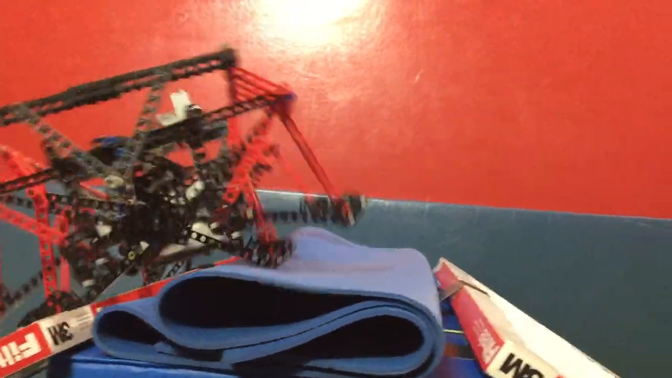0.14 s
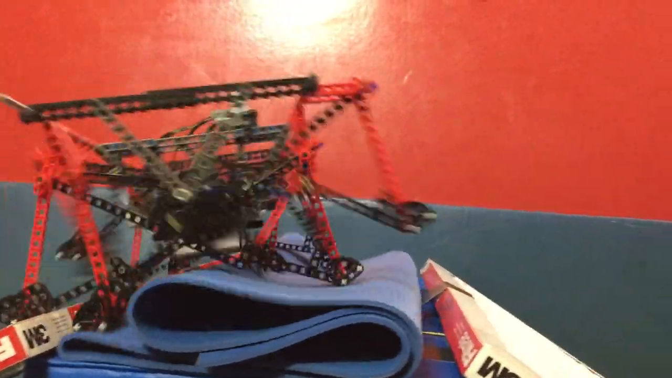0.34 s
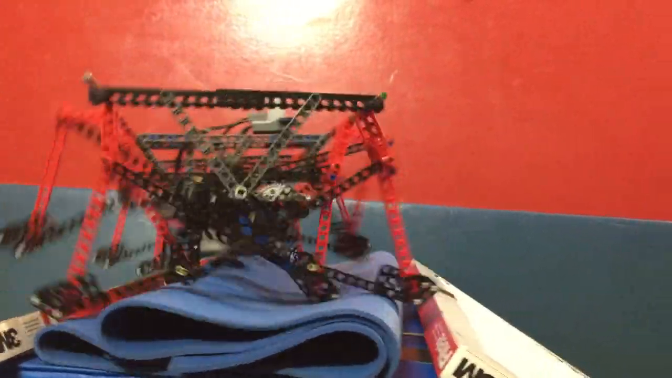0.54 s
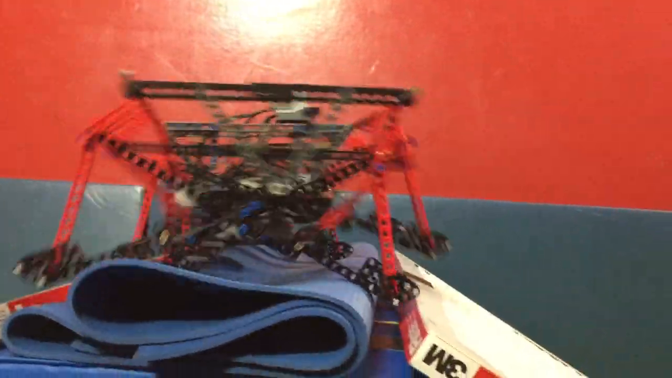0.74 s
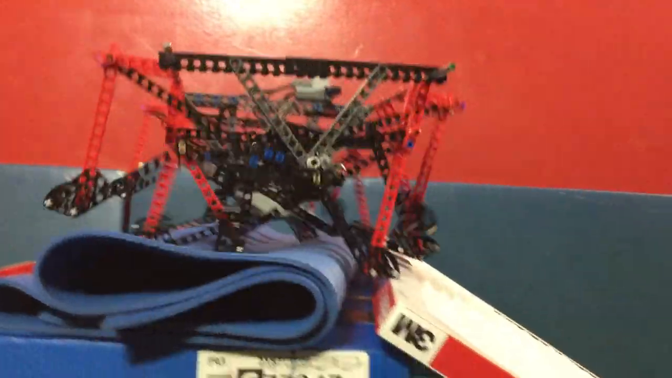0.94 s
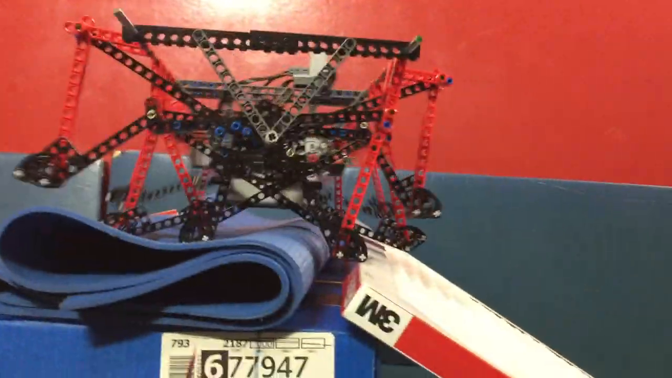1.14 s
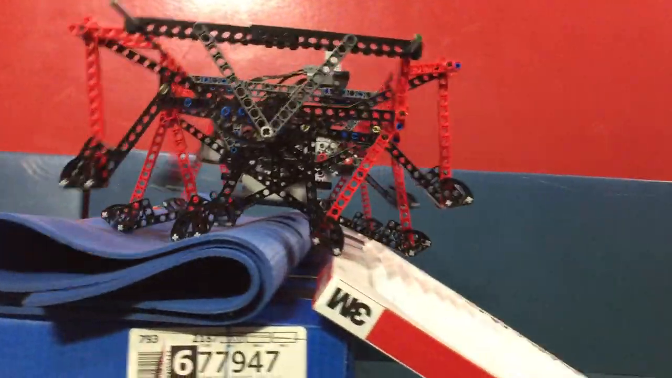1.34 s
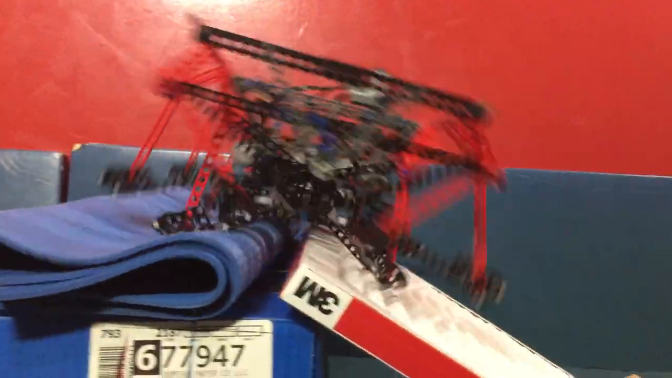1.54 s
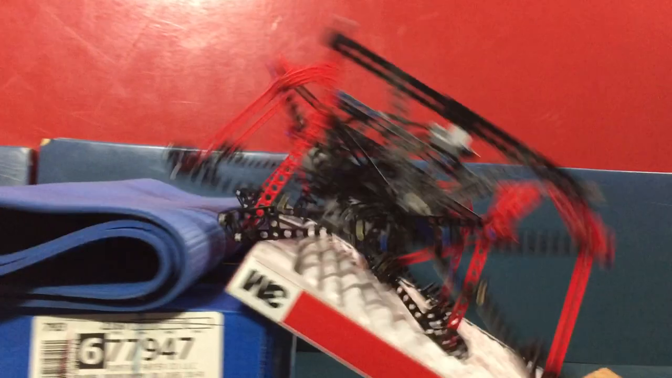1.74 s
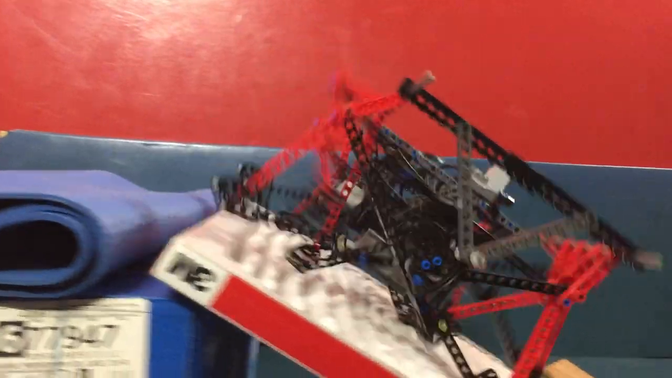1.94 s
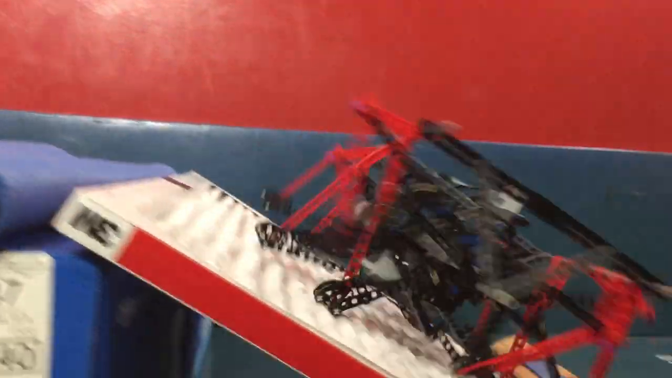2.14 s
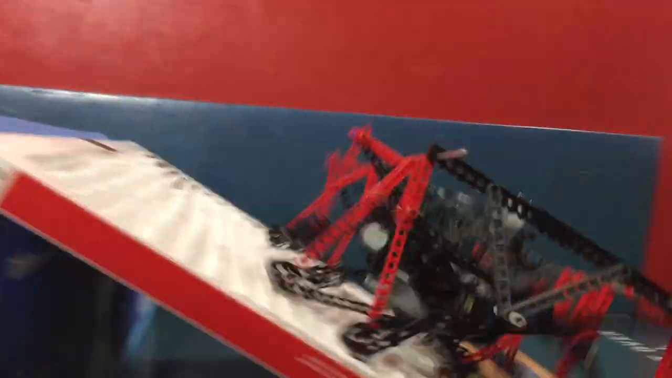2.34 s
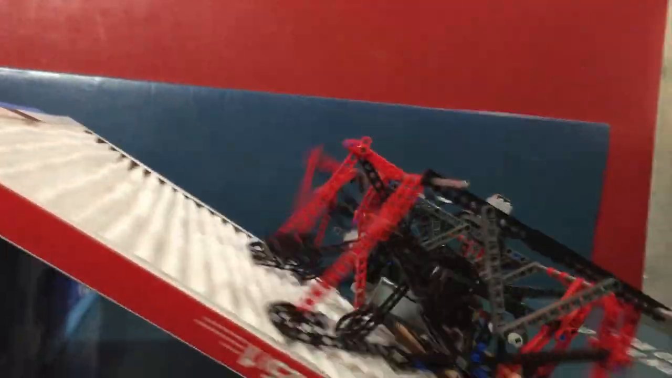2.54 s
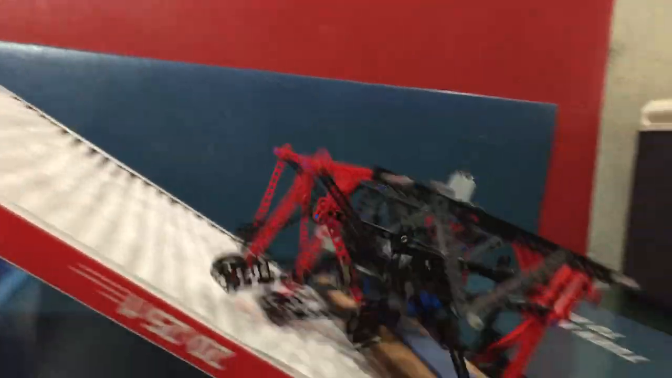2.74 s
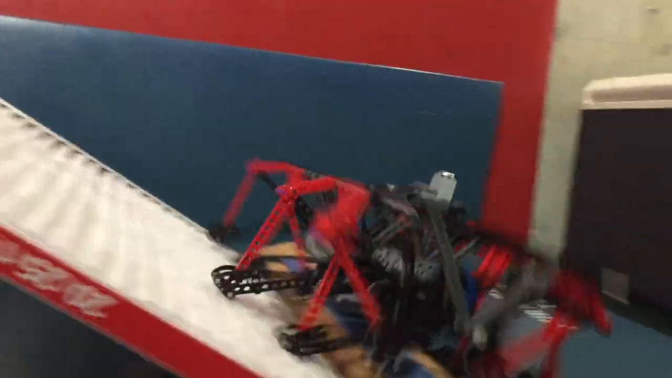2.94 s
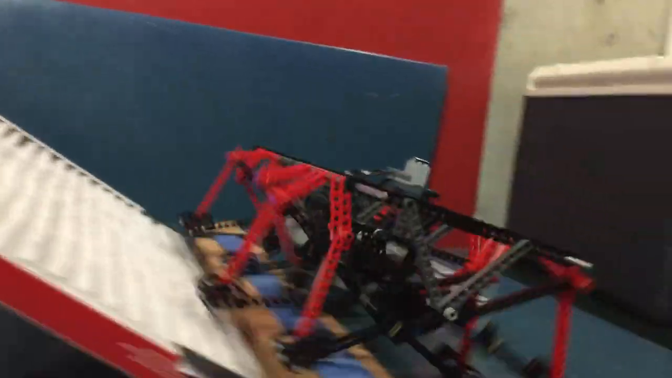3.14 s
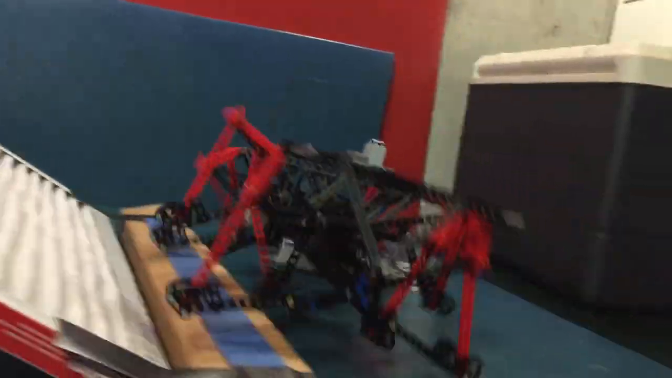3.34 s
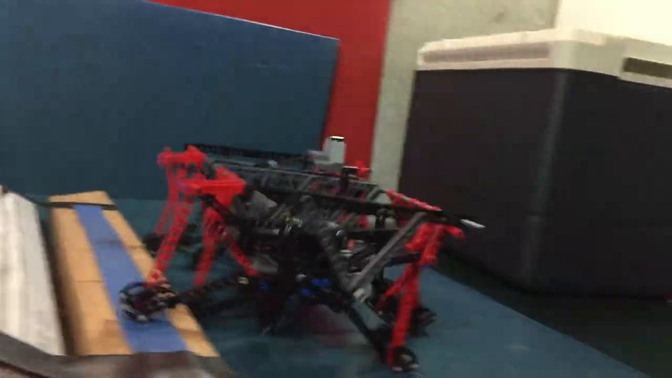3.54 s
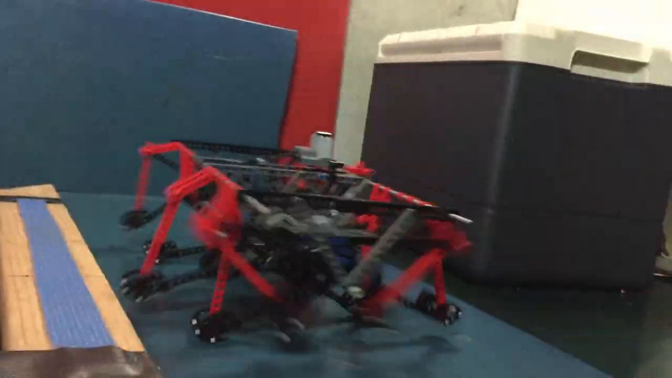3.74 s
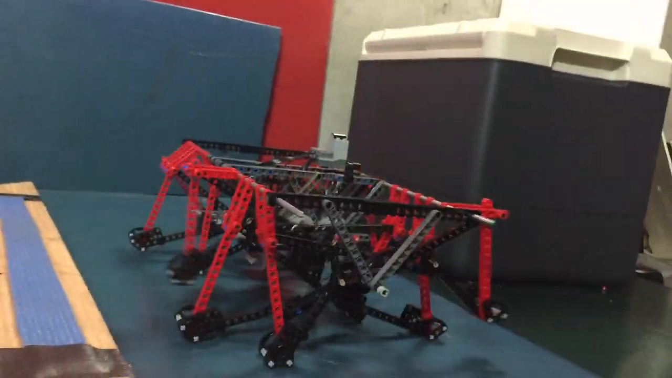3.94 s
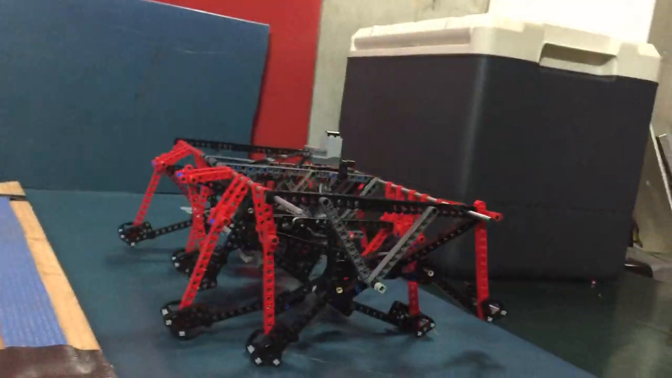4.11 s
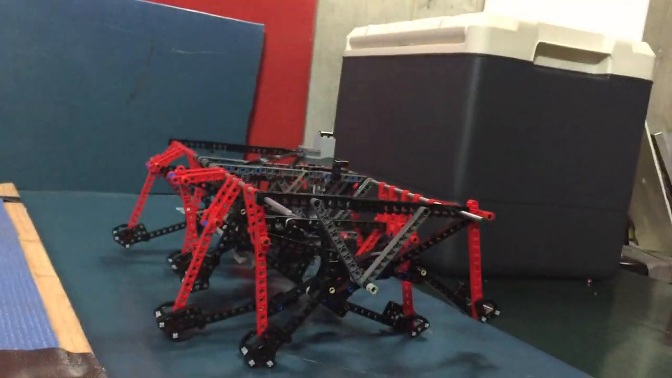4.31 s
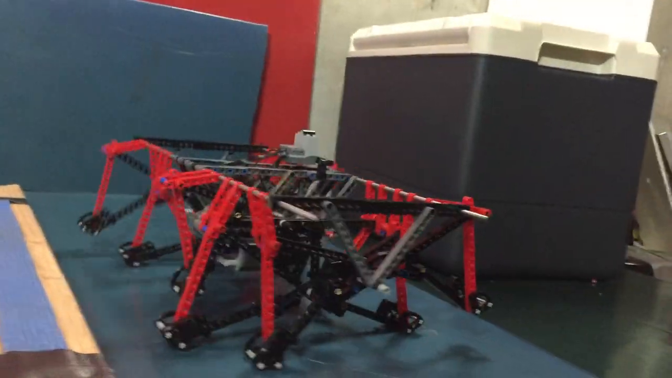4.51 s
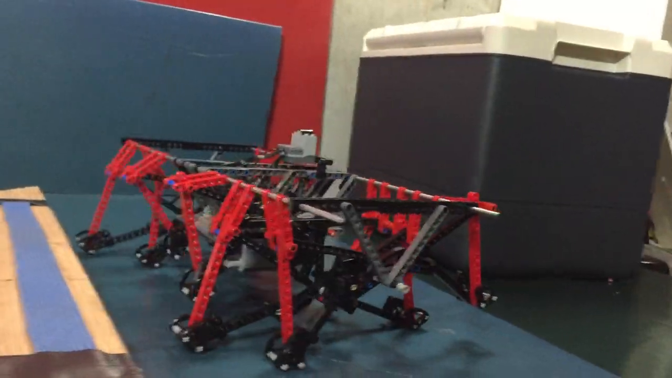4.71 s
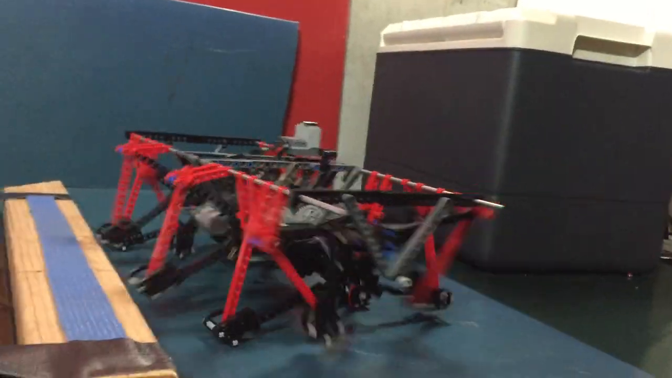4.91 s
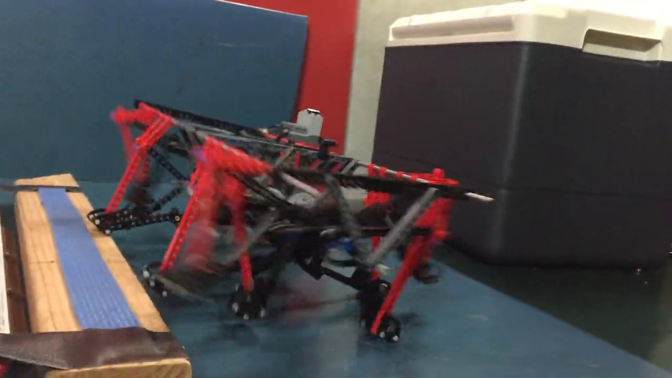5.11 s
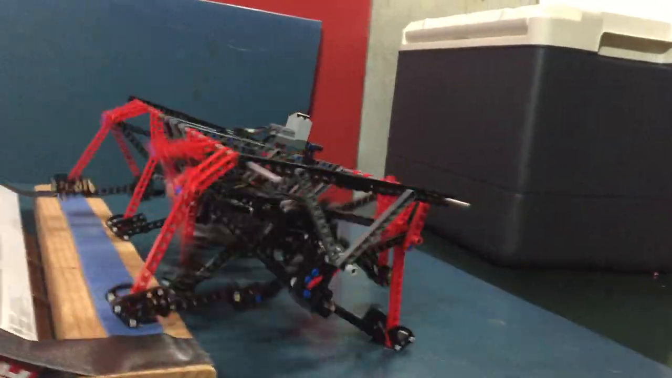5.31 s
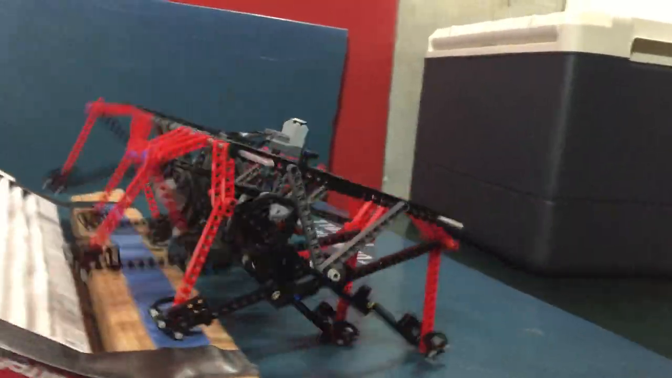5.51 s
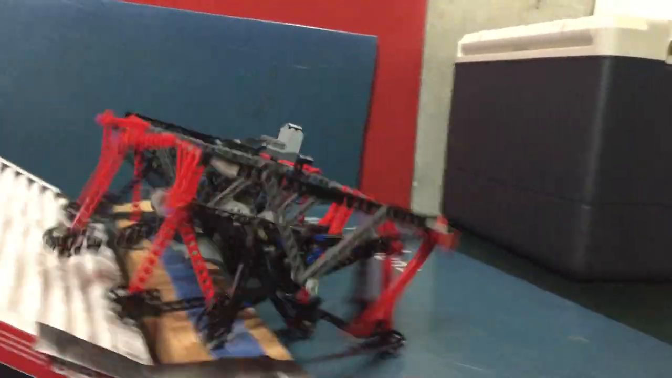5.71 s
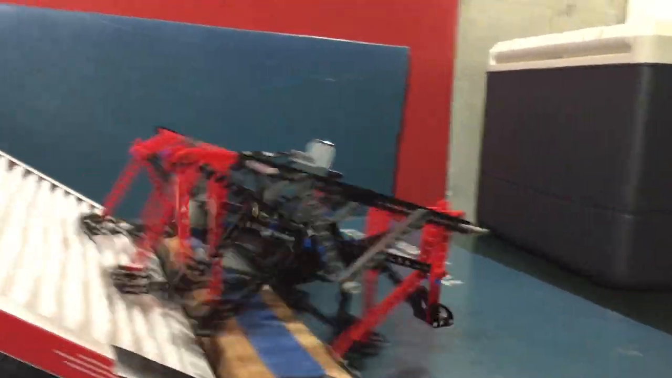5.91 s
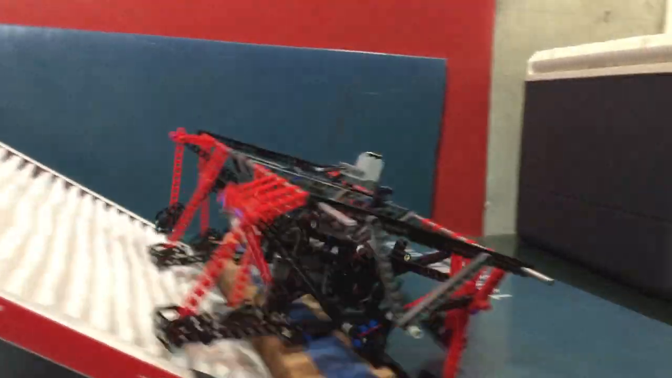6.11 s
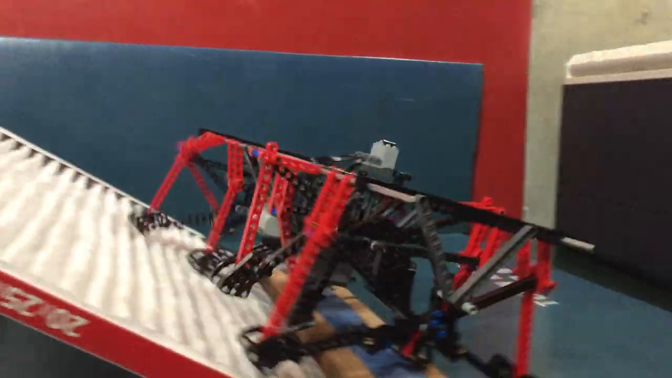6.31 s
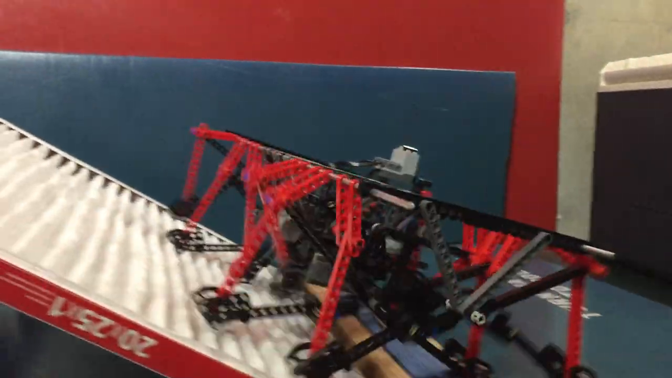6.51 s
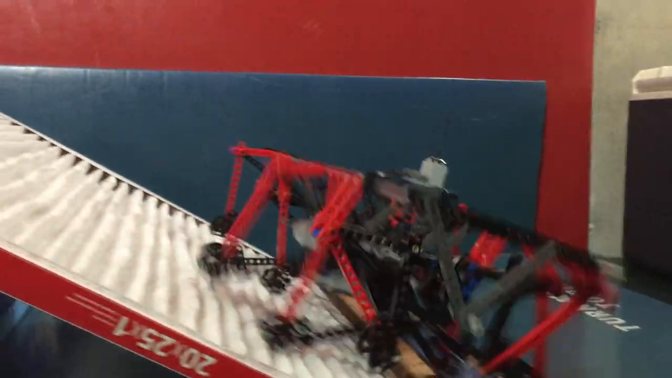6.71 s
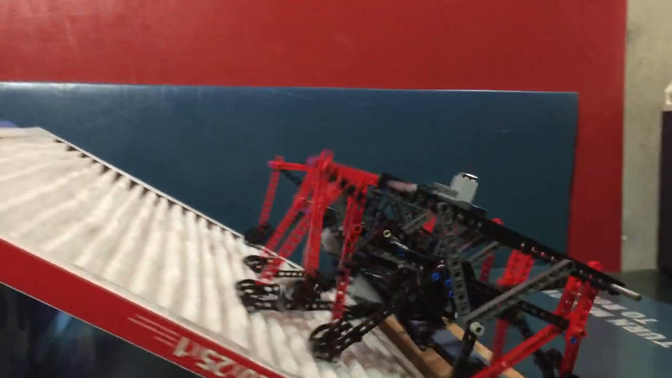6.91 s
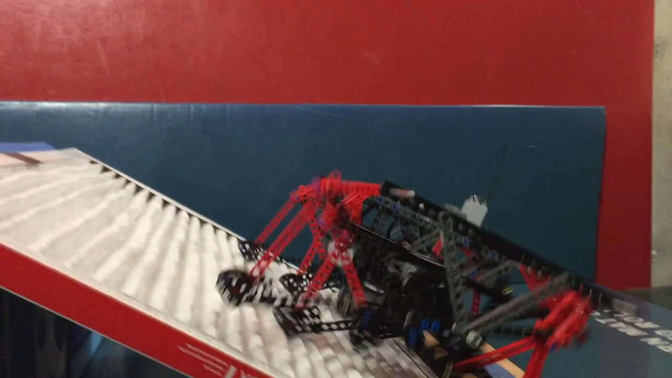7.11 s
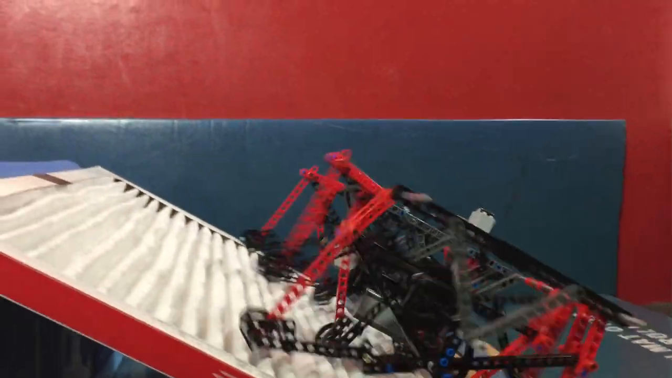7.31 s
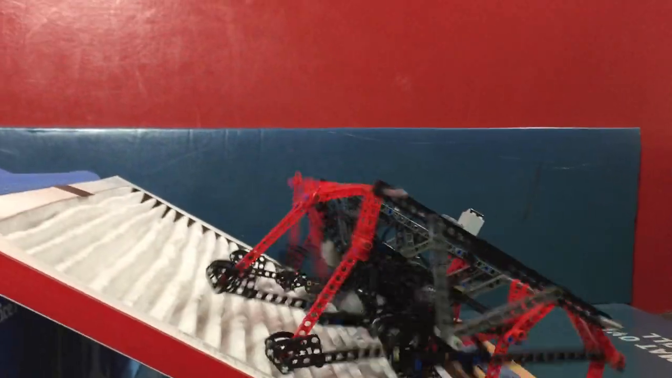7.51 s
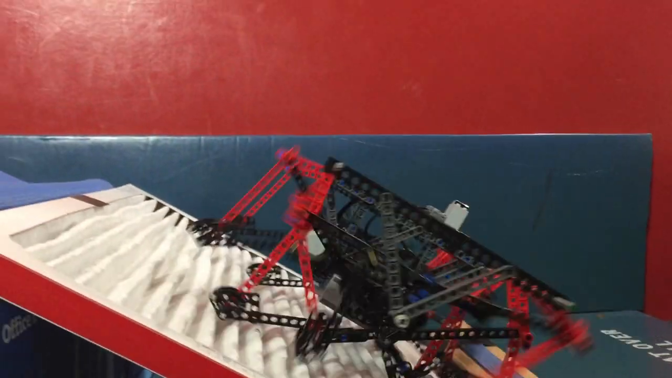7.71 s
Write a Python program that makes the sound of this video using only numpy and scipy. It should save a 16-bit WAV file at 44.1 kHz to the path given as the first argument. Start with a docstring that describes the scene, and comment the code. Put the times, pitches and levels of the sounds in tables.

```python
"""Small motors and gears hiss and whine as a many-legged plastic walking toy climbs over a folded mat, down and
up a pleated cardboard ramp and across a padded floor; it stops twice to reverse. Feet knock and drag, loose
joints clack, tick and rattle. Filtered noise makes the hiss, scuff and rumble, gliding blurred sines the squeals,
and short forces on resonances the knocks. A small hard room, one phone microphone.
"""
import sys
import numpy as np
from scipy import signal
from scipy.fft import rfft, irfft, next_fast_len
from scipy.io import wavfile
from scipy.ndimage import uniform_filter1d, map_coordinates

SR = 44100
rng = np.random.default_rng(int(sys.argv[2]) if len(sys.argv) > 2 else 0)


def convert_level_to_amplitude(level_db):
    """Map a level in decibels to its linear amplitude factor."""
    exponent = np.asarray(level_db, float) / 20
    return 10 ** exponent


def log_audio(samples):
    """Write samples as a 16-bit WAV file to the path given in sys.argv[1]."""
    # one column per channel
    frames = np.atleast_2d(samples).T
    # limit to full scale, then quantise
    limited = np.clip(frames, -1, 1)
    pcm = np.round(limited * 32767).astype(np.int16)
    wavfile.write(sys.argv[1], SR, pcm)


N = 341775

# Footfalls. Each row: first touch in seconds, relative levels of leg clack, ramp and floor in dB,
# floor pitch favoured at that spot in Hz.
FOOTFALLS = [(0.045, -48, -70, -59, 670), (0.0638, -55, -70, -48.5, 620), (0.095, -50, -57, -68, 633),
             (0.1615, -46, -54, -54, 500), (0.196, -36, -54, -56, 810), (0.212, -53, -61, -52, 640),
             (0.23, -44, -58, -56, 470), (0.246, -47, -55, -72, 650), (0.265, -49, -53, -60, 350),
             (0.293, -52, -74, -71, 420), (0.5359, -42.5, -55.5, -69, 350), (1.7344, -49, -62, -59.5, 700),
             (1.8215, -34.5, -53, -60, 606), (2.1833, -50, -52.5, -59, 1040),
             (2.2187, -34.5, -55, -73, 900), (2.2712, -30.5, -43, -46, 910),
             (2.4857, -29.5, -53, -62, 1110), (2.5071, -30, -62, -47, 720), (2.5734, -31.5, -67, -52, 830),
             (2.6695, -46, -53, -80, 370), (2.7186, -29, -46, -41.5, 800), (2.793, -32.5, -49, -46, 815),
             (3.0396, -27.5, -46, -39.5, 496), (3.0453, -31.5, -54, -40.5, 550),
             (3.0501, -30.5, -61, -42, 470), (3.0921, -23, -40, -24, 555), (3.1254, -56, -68, -52.5, 698),
             (3.1925, -41, -56, -45.5, 720), (3.264, -39, -79, -50, 530), (3.271, -38, -60, -37.5, 510),
             (3.313, -47, -52, -43, 620), (3.3797, -36, -64, -44, 825), (3.51, -42, -79, -41, 810),
             (3.5296, -40, -75, -43, 620), (3.6185, -23, -41, -27, 590), (3.6227, -28, -40.5, -49, 560),
             (3.66, -57, -60, -44.5, 620), (3.692, -27, -57, -41, 660), (3.72, -48, -56, -41.5, 760),
             (3.871, -56, -84, -45, 590), (3.9946, -65, -81, -49.5, 720), (4.001, -65, -78.5, -47, 735),
             (4.5592, -53, -83, -47, 740), (4.566, -46, -79, -53, 770), (4.61, -40, -63, -47, 595),
             (4.9363, -38, -74, -43.5, 620), (4.971, -37, -83, -39.5, 600), (5.0417, -38, -74, -52, 520),
             (5.0582, -43, -59, -44.5, 547), (5.0813, -34.5, -63, -62, 650), (5.271, -39, -72, -46.5, 710),
             (5.401, -39.5, -64, -45, 590), (5.6077, -37, -68, -40, 630), (5.628, -62, -68, -54, 610),
             (5.67, -40, -46, -55, 570), (5.675, -26, -42, -33, 480), (5.69, -49, -55, -57, 610),
             (5.739, -44, -71, -53, 640), (5.8677, -40, -63, -51, 726), (6.012, -40, -69, -49, 710),
             (6.026, -44, -57, -43, 770), (6.119, -33, -56, -39.5, 735), (6.138, -38, -66, -51, 625),
             (6.1565, -33.5, -55, -43, 640), (6.286, -40.5, -83, -55.5, 840),
             (6.455, -45.5, -54.5, -62, 360), (6.613, -43, -59, -57, 463), (6.8258, -55, -58, -54, 550),
             (6.8586, -45, -51.5, -52.5, 610), (6.8987, -45, -77, -76, 760), (7.24, -45, -88.5, -51, 865),
             (7.479, -56, -61.5, -58.5, 930), (7.553, -45, -63, -71, 800)]
# Joint knocks, legs alone. Each row: first touch in seconds, relative levels of leg clack and crack in dB,
# favoured leg pitch in Hz.
JOINT_KNOCKS = [(0.9052, -28, -61, 1350), (0.916, -44, -60, 1300), (0.921, -45, -55, 2300),
                (0.934, -37, -55, 1900), (1.0141, -53, -22, 2780), (1.4675, -25, -54, 2270),
                (1.549, -39.5, -55, 1800), (1.595, -47, -43, 2300), (1.855, -39, -54, 1960),
                (1.864, -31, -50, 1500), (1.873, -29, -45, 1340), (1.952, -35.5, -45, 1630),
                (2.03, -37, -16.5, 2450), (2.037, -31.5, -38, 1670), (2.3794, -27, -44, 1420),
                (3.021, -41, -35, 3300), (3.1913, -32, -17.5, 3040), (4.3105, -55, -62, 2530),
                (4.7382, -33, -41, 2410), (5.044, -29, -55, 2400), (5.819, -43, -41, 2400),
                (5.8256, -32, -59, 2200), (6.902, -60, -30, 3000), (7.2365, -32, -26, 2700),
                (7.2388, -29, -23, 3200), (7.242, -35, -38, 1900), (7.4777, -29, -41, 2480),
                (7.483, -35.5, -57, 1400)]
# Resonances of padded floor, plastic legs and motor housing. Each row: centre in Hz, width in Hz,
# relative peak in dB.
FLOOR_MODES = [(382, 100, 1), (520, 138, 4.5), (650, 73, 4), (800, 63, 5.5), (900, 48, 2),
               (1110, 133, -12.5), (590, 520, -5)]
LEG_MODES = [(1134, 826, -2), (1464, 342, 5), (1776, 684, -0.5), (2840, 590, 1), (3200, 830, -3.5)]
HOUSING_MODES = [(2210, 640, -6.5), (3407, 700, 0), (4100, 710, 2.5), (5940, 2050, 1.5), (7140, 1200, 4),
                 (8480, 1470, 0), (10080, 750, -0.5)]
# Top-octave colour of gears and ticks. Each row: frequency in Hz, relative density in dB per Hz.
SIZZLE_SPECTRUM = [(9800, -26), (10500, 2), (11500, 6), (13500, 4), (15500, 2.5), (16300, -34)]


def gears():
    """Tooth contacts hiss through the motor housing; the load on the legs makes the level flutter."""
    rattle_db, scrape_db = -16.5, -24  # hiss and scuff shaken up by a knock, against its leg clack
    hiss_db, bright_db, scuff_db = motor()
    load_db = 0.84 * wobble(12) + 0.63 * wobble(35) + 0.65 * wobble(90)
    slip_db = 1.5 * wobble(30)
    teeth = grit(spread_db=1.3, patchy_db=1.8)
    housing_hiss = unit(filtered(teeth, body(HOUSING_MODES)))
    sizzle = unit(filtered(teeth, colour(SIZZLE_SPECTRUM)))
    hiss = housing_hiss + convert_level_to_amplitude(bright_db) * sizzle
    scuff = unit(filtered(grit(spread_db=3.5, patchy_db=2.5), twice(LEG_MODES)))
    # a joint knock rattles the gears less than a footfall, and the legs hardly at all
    hiss_gain = np.hypot(convert_level_to_amplitude(hiss_db), convert_level_to_amplitude(rattle_db) * rattle(joint_db=-8))
    scuff_gain = np.hypot(convert_level_to_amplitude(scuff_db - 8.0), convert_level_to_amplitude(scrape_db) * rattle(joint_db=-24))
    return convert_level_to_amplitude(load_db) * hiss_gain * hiss + convert_level_to_amplitude(load_db + slip_db) * scuff_gain * scuff


def motor():
    """Hiss, brightness and scuff in dB: the gears spin up, run with brief dips and coast to rest."""
    # Gear train. Each row: time in seconds, hiss level before bouts and dips in dB, top-octave brightness
    # against the hiss in dB, relative leg-scuff level in dB.
    gear_train = [(0, -51.5, -4.5, -48), (.1, -53, -8, -47.5), (.3, -51, -4.5, -51.5), (.8, -51, -7, -56),
                  (1.17, -53.5, -6, -58.5), (1.44, -50.5, -13, -59), (1.55, -51, -5, -51),
                  (1.7, -48, -4.5, -53), (1.92, -48.5, -1.5, -51), (2.4, -46, -3, -46),
                  (2.76, -46, -3, -54), (2.95, -48.5, -3.5, -53.5), (3.2, -49.5, -3.5, -53.5),
                  (3.42, -46, -4.5, -47), (3.6, -46, -2.5, -49), (3.85, -46.5, -5, -51.5),
                  (3.98, -50.5, -6, -54), (4.07, -58.5, -6.5, -65.5), (4.47, -49, -11, -54),
                  (4.62, -47.5, -6, -53), (4.79, -59, -8.5, -59), (4.96, -45.5, -6, -49),
                  (5.2, -46, -7, -56), (5.6, -46, -3.5, -55), (5.8, -48.5, -5.5, -56),
                  (6.0, -44, -6.5, -46.5), (6.27, -44, -7.5, -53), (6.37, -49.5, -9.5, -57),
                  (6.69, -47, -5.5, -57), (6.89, -45.5, -5, -51.5), (7.06, -51.5, -7, -58),
                  (7.3, -47.5, -7, -57), (7.43, -49.5, -9, -55), (7.5, -50, -7.5, -50),
                  (7.75, -48, -4, -66.5)]
    # Bouts. Each row: switch-on in seconds, switch-off in seconds, coast-down in dB per second,
    # spin-up time constant in seconds.
    bouts = [(-1, 4.07, 150, .02), (4.397, 4.8, 300, .031), (4.875, 9, 200, .013)]
    # Brief dips. Each row: centre in seconds, depth in dB (negative lifts), length between 1/e points in seconds.
    dips = [(0.14, 3, 0.094), (1.49, 6, 0.076), (1.774, 6, 0.064), (2.485, 3.5, 0.063), (2.64, 4, 0.066),
            (3.027, -5, 0.056), (3.244, 0, 0.032), (3.486, 5.5, 0.09), (3.904, 4, 0.036), (6.367, 2, 0.093),
            (6.756, 4, 0.13), (7.062, -0.5, 0.099), (7.44, -1, 0.2)]
    idle_db = -43.5  # faint hiss at rest against running
    t = np.arange(N) / SR
    speed = np.zeros(N)
    for on_s, off_s, coast_db_per_s, spin_s in bouts:
        spin_up = (1 - np.exp(-np.maximum(t - on_s, 0) / spin_s)) ** 2
        speed += spin_up * convert_level_to_amplitude(-coast_db_per_s * np.maximum(t - off_s, 0))
    dip_db = sum(depth * np.exp(-(2 * (t - s) / length) ** 2) for s, depth, length in dips)
    gain_db = 20 * np.log10(speed + convert_level_to_amplitude(idle_db)) - dip_db
    hiss_db, bright_db, scuff_db = curves(gear_train)
    return hiss_db + gain_db, bright_db, scuff_db + gain_db


def rattle(joint_db):
    """How hard the frame still shakes after the knocks: each blow decays exponentially."""
    t60_s = 0.33
    blows = [row[:2] for row in FOOTFALLS] + [(s, db + joint_db) for s, db, *_ in JOINT_KNOCKS]
    s, leg_db = np.transpose(blows)
    impulses = np.bincount(np.round(s * SR).astype(int), convert_level_to_amplitude(leg_db), N)
    return signal.lfilter([1], [1, -convert_level_to_amplitude(-60 / (t60_s * SR))], impulses)


def whine():
    """The clearest squeals and squeaks, and a swarm of brief faint ones that follow the loudness of the gears."""
    # Gear squeals. Each row: start and end in seconds, start and end tooth-mesh rate in Hz,
    # level before the carry of each multiple in dB.
    gear_squeals = [(1.885, 1.92, 1517, 1585, -54), (1.915, 1.99, 1585, 1590, -53),
                    (1.99, 2.055, 1555, 1590, -52), (2.05, 2.175, 1580, 1620, -53),
                    (2.25, 2.315, 1590, 1625, -53), (2.305, 2.415, 1620, 1800, -50),
                    (5.9, 5.96, 1070, 990, -57), (6.56, 6.61, 1185, 1140, -54),
                    (6.63, 6.665, 1285, 1180, -51), (6.66, 6.735, 1190, 1060, -54.5),
                    (6.78, 6.815, 1140, 1170, -56), (7.6, 7.748, 1110, 1178, -55)]
    # Multiples of the tooth-mesh rate that sound: one bare number each.
    multiples = [2, 3, 4, 5, 6]
    # How the multiples carry. Each row: frequency in Hz, gain in dB.
    mesh_carry = [(2200, -18), (3500, -5), (4250, 0), (5300, 0), (5800, -11), (6350, -2), (7150, -2),
                  (8000, -9), (9500, -24)]
    # Single lines: squeals, squeaks, lone gear-whine lines and short rustles. Each row: start and end in
    # seconds, # start and end pitch in Hz, relative level in dB, blur in Hz.
    squeaks = [(1.1, 1.19, 2030, 2070, -63, 60), (1.16, 1.21, 3000, 3220, -65, 100),
               (1.26, 1.345, 3850, 3450, -61, 70), (1.34, 1.45, 3300, 3080, -66, 100),
               (1.29, 1.4, 2490, 2250, -68, 100), (3.013, 3.053, 4250, 4600, -54, 700),
               (3.93, 4.13, 4100, 3500, -58, 500), (4.04, 4.16, 2200, 1600, -62, 1200),
               (4.308, 4.39, 3300, 3100, -73, 1500), (4.308, 4.36, 1400, 1100, -73, 800),
               (4.41, 4.47, 400, 740, -75, 150), (4.46, 4.61, 2180, 2650, -58, 120),
               (4.58, 4.67, 3800, 4050, -59, 120), (4.742, 4.775, 1550, 1680, -50, 350),
               (4.775, 4.815, 1600, 1420, -54, 350), (4.925, 4.965, 3200, 3550, -56, 100),
               (4.96, 5.04, 3550, 3520, -56, 100), (5.08, 5.105, 3950, 3880, -55, 150),
               (5.135, 5.16, 3950, 3880, -56, 150), (5.18, 5.25, 3400, 3620, -57, 100),
               (5.3, 5.425, 4100, 3860, -55, 110), (5.75, 6.008, 2400, 2680, -58, 200),
               (5.818, 5.85, 2450, 2350, -54, 600), (6.0, 6.056, 8200, 8000, -59, 120),
               (6.12, 6.17, 4820, 4550, -54, 120), (6.2, 6.285, 5000, 4450, -51, 160),
               (6.6, 6.83, 3450, 3500, -59, 110), (1.83, 1.9, 3200, 3600, -52, 1500),
               (1.9, 2.0, 4050, 4200, -57, 150), (6.2, 6.27, 4150, 4000, -54, 250),
               (5.955, 5.995, 4950, 5300, -54, 120), (6.86, 6.89, 4200, 4050, -55, 250),
               (7.16, 7.205, 2080, 2020, -62, 120), (7.255, 7.32, 4050, 3800, -51, 700),
               (7.262, 7.298, 2020, 1980, -55, 60), (7.295, 7.358, 2130, 2180, -54, 90),
               (7.368, 7.43, 2270, 2220, -57, 80)]
    clear, swarm = np.zeros((2, N + SR))
    lines = [(start, end, k * hz0, k * hz1, db + along(mesh_carry, k * hz0), 115)
             for start, end, hz0, hz1, db in gear_squeals for k in multiples]
    for start, end, hz0, hz1, db, blur_hz in lines + squeaks:
        n = round((end - start) * SR)
        clear[round(start * SR):][:n] += convert_level_to_amplitude(db) * squeal(n, hz0, hz1, blur_hz)
    for at, life, pitch, glide in rng.random((900, 4)):
        n = round((.03 + .1 * life) * SR)
        hz = 2000 + 8000 * pitch
        swarm[int(at * N):][:n] += squeal(n, hz, hz * (1 + 0.099 * (glide - .5)), blur_hz=130)
    faint = unit(filtered(swarm[:N], body(HOUSING_MODES)))
    return clear[:N] + convert_level_to_amplitude(motor()[0] - 5.5) * faint


def squeal(out_len, hz0, hz1, blur_hz):
    """A gliding line, blurred by uneven teeth into a narrow band and broken into patches."""
    u = np.linspace(0, 1, out_len)
    knots = rng.standard_normal((3, out_len // 40 + 4))
    blur = [map_coordinates(row, [np.arange(out_len) * blur_hz / SR]) for row in knots[:2]]
    flicker = map_coordinates(knots[2], [np.arange(out_len) / 800])
    phase = 2 * np.pi * np.cumsum(hz0 + (hz1 - hz0) * u + 45 * flicker) / SR
    clear = 1.15 * min(1, 100 / blur_hz)  # blur beyond 100 Hz weakens the clean line
    fade = np.clip(8 * np.minimum(u, 1 - u), 0, 1)
    line = (clear + .4 * blur[0]) * np.sin(phase) + .55 * blur[1] * np.cos(phase)
    return fade * convert_level_to_amplitude(2.5 * flicker) * line


def steps():
    """A toe touches, the blow lands, then separate bounces and a dying shiver run through ramp, floor and legs."""
    # Colour of the crack. Each row: frequency in Hz, relative gain in dB.
    crack_spectrum = [(2500, -8), (4500, 2), (10000, 0), (15500, 4), (16200, -38)]
    step_crack_db = -9  # crack of a footfall against its leg clack
    off_spot_db, off_pitch_db = -5, -11  # loss of a floor mode, of a leg mode, an octave from the favoured pitch
    joint_dry_db = -16  # a joint knock shivers and bounces less than a footfall
    landing = round(.002 * SR)  # samples from first touch to the blow
    # parts 0-3: ramp, floor, legs, crack; one force for each floor and leg mode
    rows = np.repeat(np.arange(4), [1, len(FLOOR_MODES), len(LEG_MODES), 1])
    t60_s = np.array([[.16], [.24], [.045], [.04]])
    shiver_db = np.array([[-35], [-43], [-35], [-16]])
    floor_hz, leg_hz = np.transpose(FLOOR_MODES)[0], np.transpose(LEG_MODES)[0]
    feet = [(s, ramp, floor, leg, leg + step_crack_db, 1, off_spot_db * abs(np.log2(floor_hz / hz)), 0)
            for s, leg, ramp, floor, hz in FOOTFALLS]
    joints = [(s, -np.inf, -np.inf, leg, crack, 2, off_pitch_db * abs(np.log2(leg_hz / hz)), joint_dry_db)
              for s, leg, crack, hz in JOINT_KNOCKS]
    t = np.arange(SR // 4) / SR
    force = np.zeros((len(rows), N + SR))
    for s, *part_db, favoured_part, favour_db, dry_db in feet + joints:
        shiver = rng.standard_normal((4, len(t))) * convert_level_to_amplitude(shiver_db)
        bounce_now = rng.random(len(t)) < 80 / SR  # 80 a second on average
        bounces = bounce_now * rng.uniform(-0.87, 1, len(t)) * convert_level_to_amplitude(-5)
        # modes are woken anew every 10 ms
        uneven = convert_level_to_amplitude(rng.normal(0, 5, (len(rows), 25))).repeat(len(t) // 25, 1)
        decay = convert_level_to_amplitude(dry_db - 60 * t / t60_s)
        after = uneven * ((shiver + bounces) * decay)[rows]
        after[:, 0] = 1  # the blow itself
        # each knock wakes other floor and leg modes
        spot_db = rng.normal(0, 1.5, len(rows)) * ((rows == 1) | (rows == 2))
        spot_db[rows == favoured_part] += favour_db
        size = convert_level_to_amplitude(np.array(part_db)[rows] + spot_db)[:, None]
        touch = round(s * SR)
        force[:, touch + landing:][:, :len(t)] += size * after
        force[:, touch] += size[:, 0] * convert_level_to_amplitude(-18.0)
    force = force[:, :N]
    # floor and thin leg beams radiate little bass
    floor_response = lambda f: resonances(FLOOR_MODES)(f) * (1j * f / (220 + 1j * f)) ** 2
    leg_response = lambda f: resonances(LEG_MODES)(f) * (1j * f / (600 + 1j * f)) ** 2
    ramp = convert_level_to_amplitude(54.5) * cardboard(force[0])
    floor = convert_level_to_amplitude(40.5) * filtered(force[rows == 1], floor_response).sum(0)
    legs = convert_level_to_amplitude(25.0) * filtered(force[rows == 2], leg_response).sum(0)
    crack = convert_level_to_amplitude(2.5) * filtered(force[-1], colour(crack_spectrum))
    return ramp + floor + legs + crack


def cardboard(force):
    """The pleated ramp drums; under weight its hollow booms too."""
    # Resonances of the card and of its hollow. Each row: centre in Hz, width in Hz, relative peak in dB.
    card_modes = [(179.4, 75, -2), (227, 65, 0.5), (325, 50, -6)]
    hollow_modes = [(48, 22, -1.5), (74, 26, 2.5), (151, 11, -2.5)]
    # Weight on the hollow ramp. Each row: time in seconds, boom gain in dB.
    weight = [(0, -3.5), (1, 0), (2.3, -3), (2.9, -9.5), (3.12, -3), (3.3, -16.5), (5, -1), (6, -17.5),
              (7, -10), (7.75, 1.5)]
    # thin card radiates little below its first mode
    stiff = lambda f: body(card_modes)(f) * (1j * f / (140 + 1j * f)) ** 2
    boom = filtered(force * convert_level_to_amplitude(curves(weight)[0]), body(hollow_modes))
    return filtered(force, stiff) + boom


def ticks():
    """Play in the pin joints: sparse, tiny, bright ticks that follow the level of the gears."""
    # Loud ticks. Each row: time in seconds, relative size in dB.
    loud_ticks = [(1.0146, 15)]
    decay_s = 0.0019
    when = rng.random(N) < 45 / SR  # 45 a second on average
    size = when * convert_level_to_amplitude(rng.uniform(2.4, 7.5, N))
    for s, db in loud_ticks:
        size[round(s * SR)] = convert_level_to_amplitude(db)
    envelope = signal.lfilter([1], [1, -np.exp(-1 / (decay_s * SR))], size)
    snap = rng.standard_normal(N) * envelope
    hiss_db, bright_db, _ = motor()
    return convert_level_to_amplitude(hiss_db + bright_db + 1.5) * filtered(snap, colour(SIZZLE_SPECTRUM))


def drag():
    """Feet sliding and small unseen steps shake the ramp and the floor in lumps."""
    # Feet dragging. Each row: time in seconds, ramp rumble in dB, floor rumble in dB.
    dragging = [(0.0, -50, -53), (0.13, -67, -81), (0.32, -78, -68), (0.6, -74, -70.5), (1.23, -77, -70.5),
                (2.18, -60, -88), (2.37, -52.5, -65), (2.85, -82, -103), (3.08, -55, -56), (3.21, -73, -76),
                (3.37, -73.5, -62.5), (3.84, -68, -60.5), (4.1, -73.5, -84.5), (4.42, -83, -114),
                (4.58, -69, -86), (4.94, -93, -71), (5.12, -72, -67), (5.7, -70, -75), (5.87, -70, -62),
                (6.09, -58.5, -58), (6.28, -76, -79), (6.65, -80, -81), (7.34, -67, -84), (7.75, -75, -91)]
    ramp_db, floor_db = curves(dragging)
    ramp_lumps_db = 4.5 * wobble(18) + 2 * wobble(60)
    floor_lumps_db = 3 * wobble(16) + 2.5 * wobble(60)
    lumps = rng.standard_normal((2, N)) * convert_level_to_amplitude([ramp_lumps_db, floor_lumps_db])
    ramp = convert_level_to_amplitude(ramp_db) * unit(cardboard(lumps[0]))
    floor = convert_level_to_amplitude(floor_db) * unit(filtered(lumps[1], twice(FLOOR_MODES)))
    return ramp + floor


def rumble():
    """The running motors shake whatever the toy stands on."""
    # Rumble colour. Each row: frequency in Hz, relative density in dB per Hz.
    rumble_spectrum = [(18, -9.5), (35, 8), (75, 1), (150, -9.5), (300, -15.5), (700, -7.5), (1200, -33)]
    against_hiss_db = -22
    return convert_level_to_amplitude(motor()[0] + against_hiss_db) * unit(filtered(rng.standard_normal(N), colour(rumble_spectrum)))


def room(x):
    """Each frequency of the room's answer dies at its own speed."""
    # Room decay. Each row: frequency in Hz, t60 in seconds.
    decay = [(200, 0.2), (1000, 0.14), (4000, 0.28), (12000, 0.015)]
    hz, t, z = signal.stft(rng.standard_normal(SR // 3), SR, nperseg=256)
    tail = signal.istft(z * convert_level_to_amplitude(-60 * t / along(decay, hz)[:, None]), SR, nperseg=256)[1]
    delayed = np.pad(x, (200, 0))  # samples
    return signal.fftconvolve(delayed, tail / np.linalg.norm(tail))[:N]


def air():
    """Room air and microphone noise: steady coloured noise."""
    # Noise colour. Each row: frequency in Hz, relative density in dB per Hz.
    air_spectrum = [(18, -25), (50, 0), (125, -2.5), (500, -4), (1000, -3), (2300, -7), (4700, -11),
                    (7000, -13), (13000, -19), (16000, -24)]
    return convert_level_to_amplitude(-76) * unit(filtered(rng.standard_normal(N), colour(air_spectrum)))


def grit(spread_db, patchy_db):
    """Dense contacts of uneven size, with patches of gain that drift in pitch and time."""
    noise = rng.standard_normal(N) * convert_level_to_amplitude(spread_db * wobble(900))
    z = signal.stft(noise, nperseg=512)[2]
    field = uniform_filter1d(rng.standard_normal(z.shape), 4, 0)
    field = uniform_filter1d(field, 8, 1)
    return signal.istft(z * convert_level_to_amplitude(patchy_db * unit(field)), nperseg=512)[1][:N]


def resonances(modes):
    """Causal response of each resonance, one row a mode, signs alternating."""
    c, w, db = np.transpose(modes)[..., None]
    sign = (-1) ** np.arange(len(modes))[:, None]
    return lambda f: sign * convert_level_to_amplitude(db) * 1j * f * w / (c * c - f * f + 1j * f * w)


def body(modes):
    """All the resonances together."""
    return lambda f: resonances(modes)(f).sum(0)


def twice(modes):
    """The resonances applied two times, for steep skirts."""
    return lambda f: body(modes)(f) ** 2


def colour(spectrum):
    """Zero-phase response from (Hz, dB) points."""
    return lambda f: convert_level_to_amplitude(along(spectrum, f))


def filtered(x, response):
    """x times a complex response of frequency."""
    m = next_fast_len(N + SR // 2)
    return irfft(rfft(x, m) * response(np.fft.rfftfreq(m, 1 / SR)), m)[..., :N]


def unit(x):
    """Scale to rms 1."""
    return x / np.sqrt(np.mean(x ** 2) + 1e-20)


def along(points, hz):
    """Interpolate (Hz, value) points on a log frequency axis."""
    f, v = np.transpose(points)
    return np.interp(np.log(hz + 1), np.log(f + 1), v)


def curves(rows):
    """One value per sample for each column after the time."""
    s, *cols = np.transpose(rows)
    return [np.interp(np.arange(N) / SR, s, c) for c in cols]


def wobble(rate):
    """A smooth random curve, rate knots a second."""
    return map_coordinates(rng.standard_normal(int(N * rate / SR) + 4), [np.arange(N) * rate / SR])


def scene():
    """One microphone, the same on both channels; the room answers the knocks."""
    knocks = steps()
    mono = knocks + convert_level_to_amplitude(-7.0) * room(knocks) + gears() + whine() + ticks() + drag() + rumble() + air()
    return np.array([mono, mono])


def roll_off(x):
    """The treble ends steeply here."""
    return signal.sosfilt(signal.butter(12, 16780, fs=SR, output="sos"), x)


def record(dry):
    """The microphone drops the deepest bass, its port has a narrow dip, and nothing above the top is kept."""
    top_hz = 15830
    bass_cut = lambda hz: (1j * hz / (45 + 1j * hz)) ** 4
    port_dip = lambda hz: convert_level_to_amplitude(-5 * np.exp(-((hz - 10450) / 250) ** 2))
    mix = filtered(dry, lambda hz: bass_cut(hz) * port_dip(hz) * (hz < top_hz))
    return roll_off(mix)


dry = scene()
out = record(dry)
log_audio(out)
```